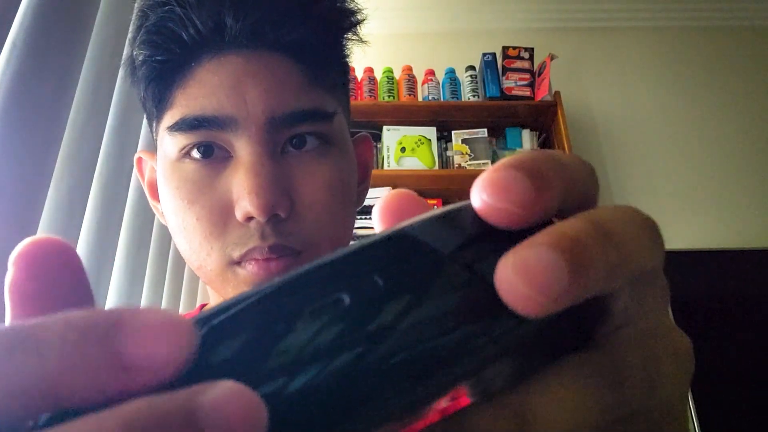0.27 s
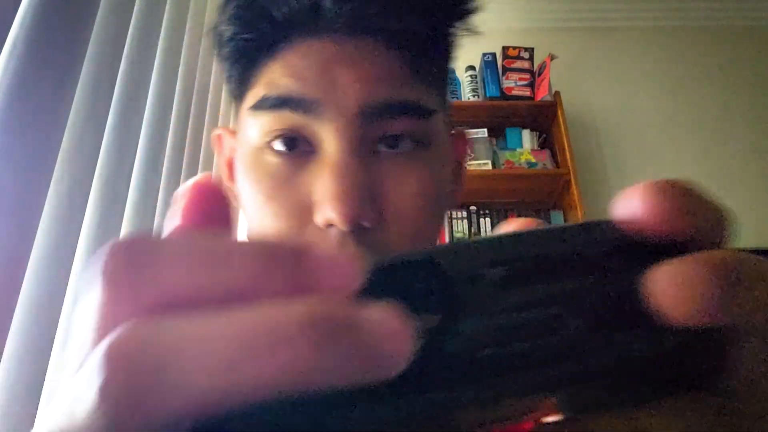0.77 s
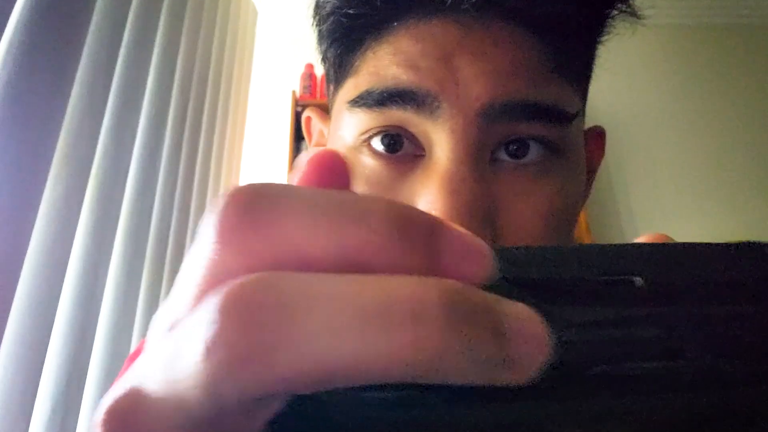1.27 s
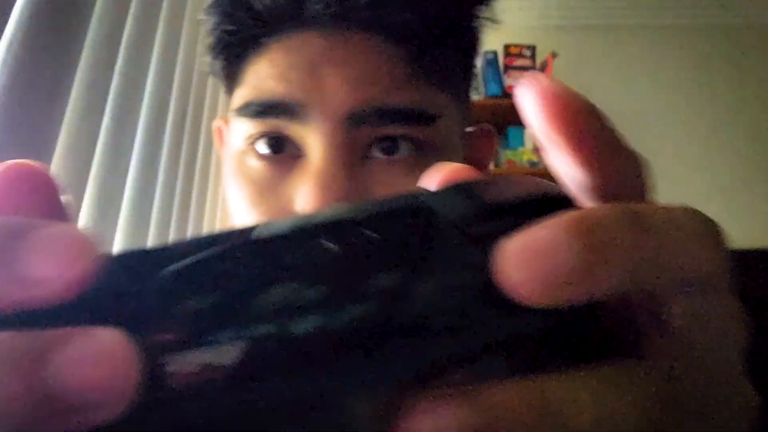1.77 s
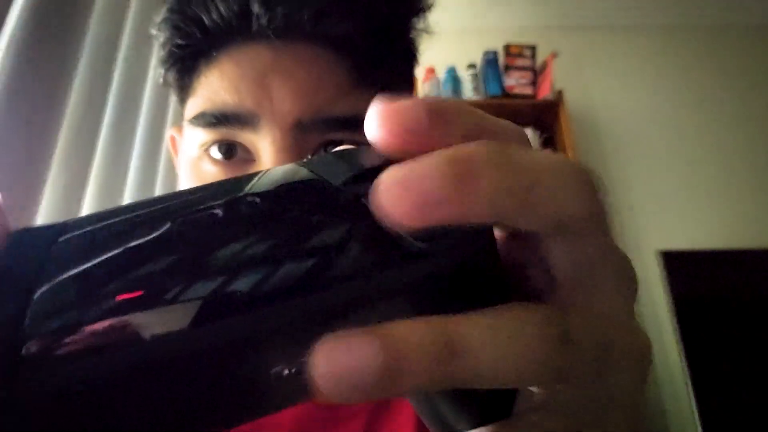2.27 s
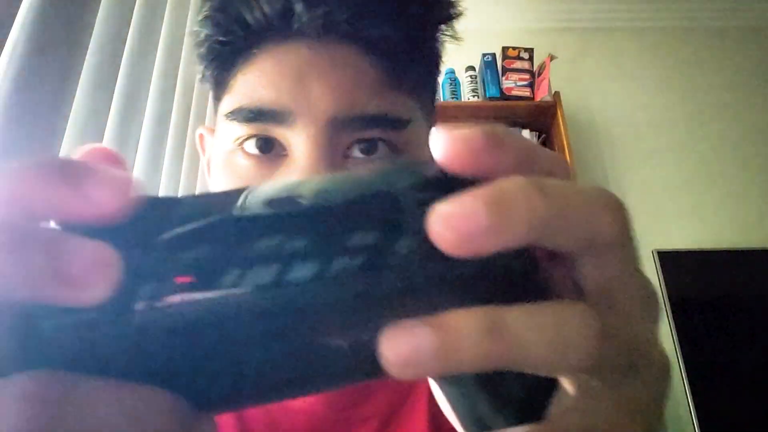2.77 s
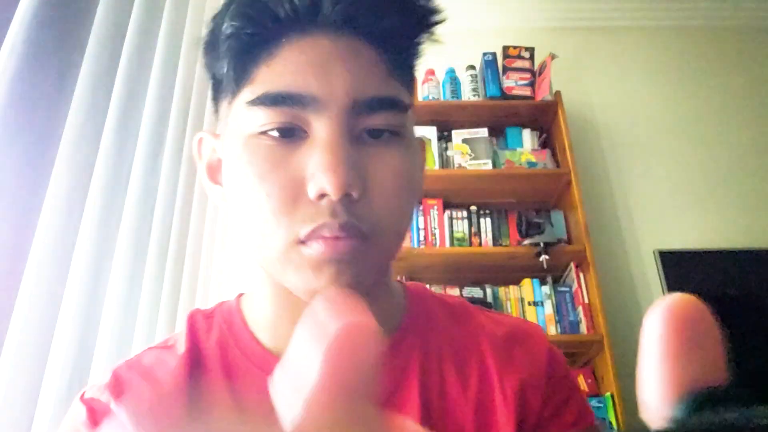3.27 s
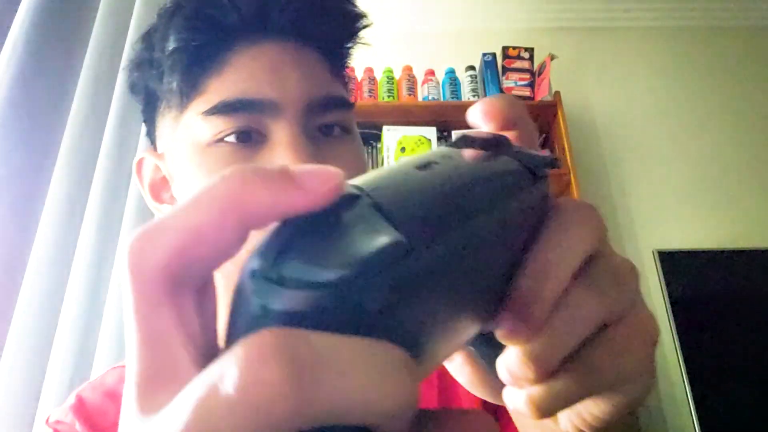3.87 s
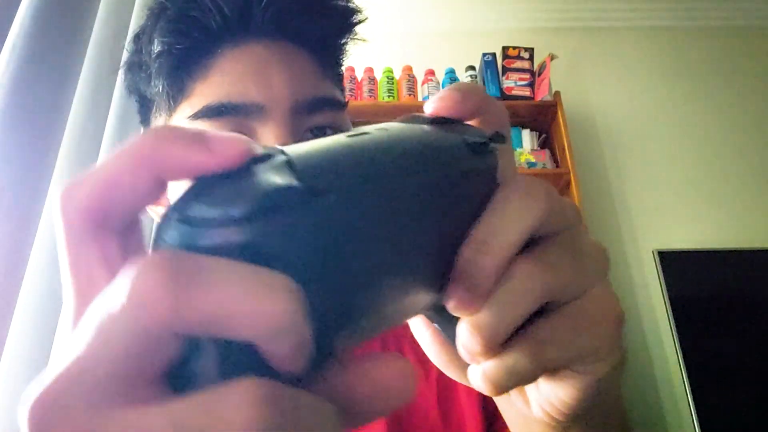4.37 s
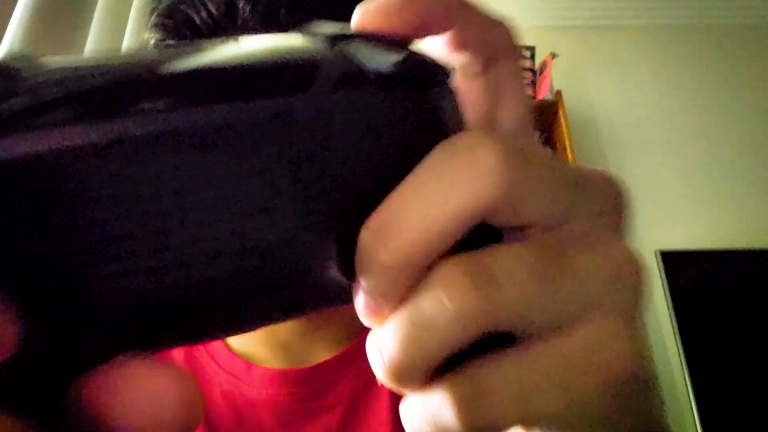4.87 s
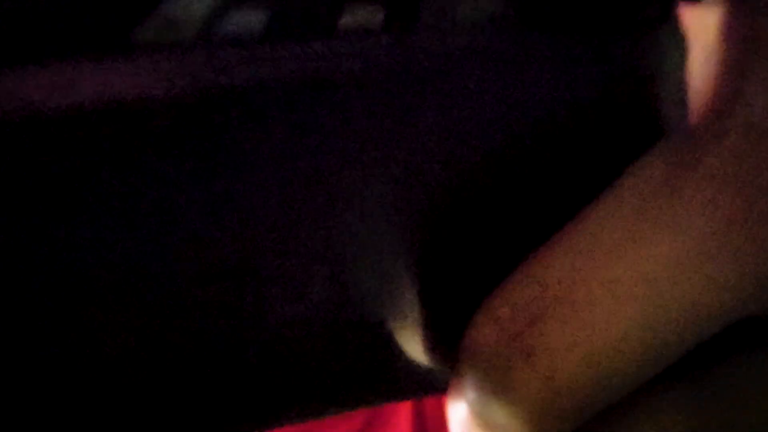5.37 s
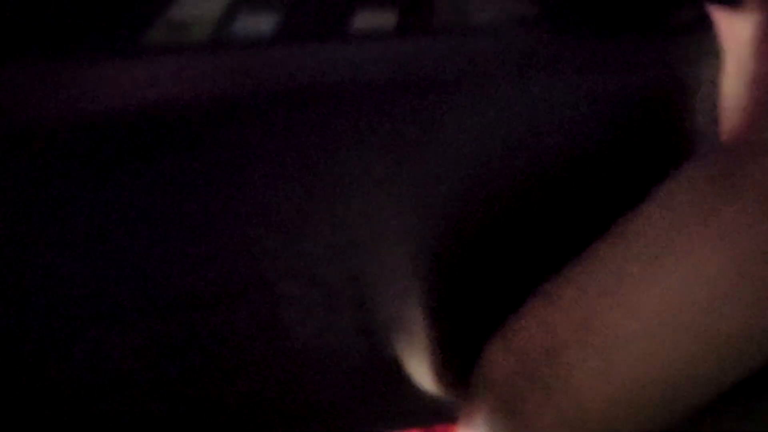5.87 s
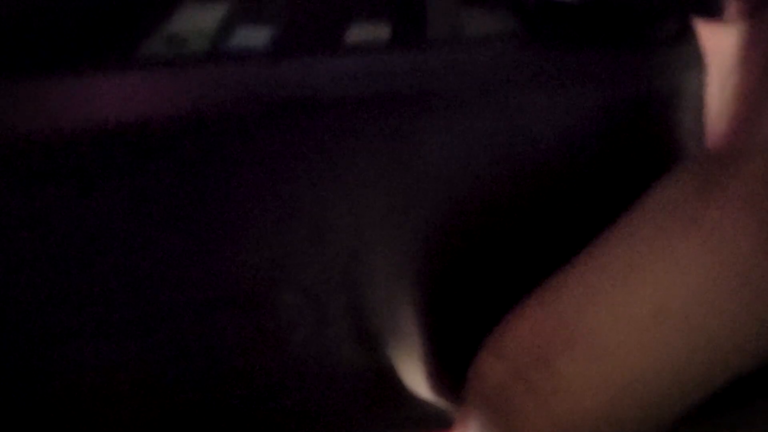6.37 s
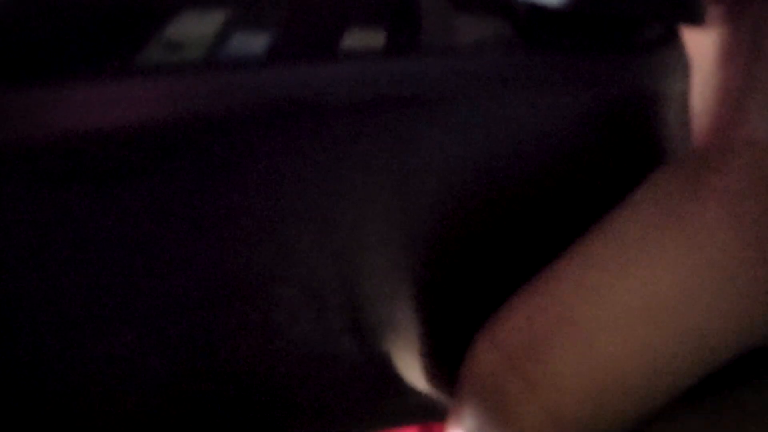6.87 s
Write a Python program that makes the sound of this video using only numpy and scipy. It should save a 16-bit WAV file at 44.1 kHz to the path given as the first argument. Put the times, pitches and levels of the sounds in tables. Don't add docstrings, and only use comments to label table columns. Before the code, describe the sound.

A hollow plastic game controller is handled very close to the microphone in a small room with a faint low hum. From 0 to 0.95 seconds, scattered firm button clicks mix with light pats and soft knocks. From 1.0 to 1.6, clicking gets denser, with hard nail snaps at 1.0 and 1.35, a slap at 1.4 and a loud knuckle rap at 1.55. Light ticks lead to another heavy rap at 2.06, a clattering double press at 2.3 and raps at 2.7 and 2.96. It is sparser around 3.0-3.5, with skin hiss, then a hard snap at 3.67. Bright slaps and small rattles continue to 4.8, with a tiny stuttering hinge creak near 4.57 and a sliding hiss near 4.9. From 5.03 to 7.1, a trigger clacks roughly every 0.2 seconds, quieter and drier, with tiny return clicks between and soft low thumps.

```python
import sys
import numpy as np
from scipy import signal
from scipy.fft import rfft, irfft, next_fast_len
from scipy.io import wavfile
from scipy.ndimage import uniform_filter1d, map_coordinates

SR = 44100
rng = np.random.default_rng(int(sys.argv[2]) if len(sys.argv) > 2 else 0)


def digitize_waveform(pressure):
    field = np.atleast_2d(pressure).T
    bounded = np.clip(field, -1, 1)
    quanta = np.round(bounded * 32767).astype(np.int16)
    wavfile.write(sys.argv[1], SR, quanta)


def gain_from_decibels(decibels):
    exponent = np.asarray(decibels, float) / 20
    return 10 ** exponent


N = 314433

# start in seconds, peak in dB, struck piece in Hz, chatter time in ms.
PRESSES = [(0.058, -5.5, 3880, 1.16), (0.5186, -8, 3900, 1.38), (0.7398, -8.5, 3860, 1.05),
           (0.9121, -8.5, 3900, 0.56), (1.242, -6, 1900, 1.6), (2.0648, -9.5, 1700, 1.5),
           (2.3081, -7, 1200, 1.6), (2.3168, -8.5, 2070, 1.27), (2.5938, -7.5, 1010, 1.2),
           (3.2254, -12.5, 1090, 0.85), (3.951, -9, 4140, 0.62)]
SLAPS = [
    (1.1034, -9, 1270, 1.36),
    (1.4174, -5, 3940, 1.4),
    (3.5501, -7, 4170, 0.68),
    (3.744, -8, 4430, 2.06),
    (4.3415, -13, 4120, 0.92),
    (4.6088, -9, 3800, 1),
    (4.8054, -7, 4040, 1.87),
]
SNAPS = [
    (0.9967, -8.5, 3730, 1.45),
    (1.347, 0.5, 3700, 0.97),
    (3.672, 0, 2820, 1.04),
]
RAPS = [
    (1.5549, 0.5, 3420, 1.06),
    (2.06, -0.5, 1600, 1.37),
    (2.7144, -6, 3130, 1.1),
    (2.961, -3, 3760, 1.23),
]
STOPS = [(5.032, -7.5, 5450, 1.54), (5.2381, -8, 3840, 0.87), (5.4147, -11, 4200, 1.47),
         (5.6557, -11, 4970, 1.07), (5.8466, -10, 2780, 1.19), (6.049, -10.5, 3800, 1.1),
         (6.275, -11.5, 3930, 1.87), (6.4859, -9.5, 4060, 1.66), (6.6824, -13, 3830, 1.06),
         (6.8976, -11.5, 4000, 1.74), (7.095, -12, 3940, 1.23)]
RETURNS = [
    (5.1416, -19, 3020, 2.7),
    (5.5633, -25.5, 3320, 1.9),
    (5.7897, -26, 3700, 1.63),
    (5.99, -26.5, 1050, 3.56),
    (6.207, -28, 3240, 3.04),
    (6.4117, -26.5, 1100, 1.5),
    (6.6109, -25.5, 2850, 1.3),
    (6.8177, -25.5, 2920, 1.2),
]
KNOCKS = [(0.2762, -24, 1270, 0.61), (0.573, -28, 1200, 0.35), (0.7315, -26.5, 1690, 1.47),
          (1.0805, -21, 6000, 1), (1.2638, -22, 1540, 0.94), (1.7993, -20.5, 4130, 0.55),
          (1.8965, -18.5, 1100, 0.81), (1.9734, -42, 1740, 3.7), (2.114, -22, 3660, 0.5),
          (2.1838, -15, 1100, 0.7), (2.6052, -19.5, 3600, 0.86), (2.7761, -24, 4860, 0.57),
          (2.8168, -20.5, 1260, 0.42), (3.5338, -18, 1620, 0.85), (3.772, -16, 1690, 0.52),
          (3.98, -20, 1710, 0.94), (4.1581, -11.5, 4300, 0.45), (4.5134, -27.5, 1140, 2.15),
          (6.9095, -21.5, 2360, 1.4)]
NUDGES = [(0.08, -34.5, 3990, 6.6), (0.447, -26, 1430, 1.2), (1.0246, -19.5, 1200, 1.96),
          (1.37, -32, 2750, 1.7), (1.4265, -14, 6100, 1.32), (1.5805, -24, 2460, 3.7),
          (1.7932, -21, 2740, 1.53), (1.9108, -16.5, 2730, 1.29), (2.1057, -24, 5960, 0.4),
          (2.348, -17.5, 3800, 0.42), (2.474, -32, 2180, 1.55), (3.132, -24, 3360, 0.79),
          (3.171, -16.5, 2950, 2.6), (3.516, -35.5, 1230, 5.7), (3.9166, -25.5, 2490, 2.3),
          (4.0963, -28, 3130, 1.28), (4.1635, -17.5, 1650, 1.05), (4.3018, -18, 2580, 1.41),
          (4.3635, -16.5, 1610, 0.77), (4.6269, -18, 1630, 1.25), (4.7325, -24, 1100, 2.56),
          (5.2273, -12, 4030, 1.53), (6.7108, -19, 2320, 1.25)]
TICKS = [(1.5693, -20, 1800, 4.2), (1.6507, -31, 2500, 0.73), (1.67, -20.5, 3120, 0.77),
         (1.7462, -26, 3900, 0.87), (1.8201, -19.5, 3920, 0.56), (1.9638, -31, 3770, 1.4),
         (1.9917, -34, 2250, 1.4), (2.22, -31.5, 4230, 0.96), (2.2563, -29.5, 3940, 0.72),
         (2.4674, -29.5, 3700, 0.93), (2.5527, -33, 4110, 0.86), (2.681, -27, 3850, 1.04),
         (3.0517, -18, 3280, 2.2), (4.2654, -37, 1640, 2.5)]
PATS = [(0.03, -26, 1360, 0.58), (0.044, -18.5, 1590, 2.6), (0.3362, -32, 1320, 0.62),
        (0.8506, -14.5, 1390, 1.43), (1.165, -21.5, 6200, 1.4), (1.3866, -26, 2190, 2.8),
        (1.3936, -28.5, 1350, 1.6), (1.5236, -28, 5000, 0.5), (2.0314, -24, 2130, 1.2),
        (2.0477, -19, 2200, 1.03), (2.3432, -17, 5020, 0.4), (2.8687, -25.5, 1150, 1.5),
        (2.912, -25.5, 1320, 1.28), (3.3086, -17, 2270, 2.2), (3.5097, -38, 1740, 2.6),
        (3.558, -30, 4350, 4.3), (3.6987, -21, 3000, 4.5), (4.744, -15, 1380, 2.24),
        (7.0237, -21.5, 2640, 1.4)]
THUDS = [(0.6279, -27, 2550, 3.3), (0.7514, -46, 1350, 0.73), (1.1967, -22.5, 1530, 2.05),
         (1.334, -31.5, 1380, 1.1), (2.451, -39, 2130, 0.65), (2.5307, -32, 1220, 2.3),
         (2.5695, -25.5, 3950, 0.47), (2.736, -15.5, 2480, 1.1), (2.7641, -21.5, 5000, 0.35),
         (2.899, -33, 1570, 2.5), (3.301, -23.5, 2340, 2.4), (4.1055, -30, 2900, 2.3),
         (4.6345, -35, 4000, 1.7), (4.8257, -15.5, 1500, 1.69), (4.8476, -33, 1450, 2.2),
         (6.0296, -33, 1500, 0.72), (6.6195, -36.5, 3700, 3.3), (7.0989, -19.5, 2340, 1.5)]
BUMPS = [(1.474, -31.5, 1750, 1.5), (2.1655, -29, 2970, 1), (2.282, -50, 1600, 1.4),
         (2.2972, -29, 1410, 1.6), (2.7947, -44, 2390, 2.8), (3.8697, -33, 1410, 3.2),
         (3.8752, -32.5, 1460, 7.9), (4.0738, -34.5, 3000, 1.03), (4.3335, -33, 1350, 2),
         (5.1513, -25, 1220, 2.02), (5.8312, -34.5, 1550, 1.1), (6.2507, -40, 1470, 1.5),
         (6.402, -35, 1370, 4.2), (6.4517, -39.5, 1310, 1.2)]
BRUSHES = [
    (0.201, -42, 1250, 1.2),
    (0.421, -60, 1380, 1.35),
    (0.823, -33.5, 1370, 1.7),
    (3.264, -36.5, 1290, 2),
    (4.947, -33, 3830, 2.8),
    (5.343, -35.5, 4020, 2.8),
]
REBOUNDS = [(0.037, -36, 1500, 0.82), (0.8355, -42, 1500, 1), (0.8735, -38, 1300, 1.2),
            (1.3995, -42, 1300, 0.83), (1.452, -35, 1300, 1), (1.4598, -35, 1700, 1),
            (1.625, -33.5, 1500, 1.1), (1.98, -42, 1300, 0.88), (2.1878, -22.5, 1100, 0.71),
            (2.79, -40, 1300, 1), (3.7285, -28, 1500, 1.1), (3.9375, -36, 1300, 1), (7.034, -39, 1300, 1)]
CLATTERS = [(2.0568, -16, 2200, 0.89), (2.0722, -28, 2110, 1.34), (2.3128, -8.5, 1200, 1.6),
            (2.3205, -21, 1900, 1.86), (2.7115, -31, 1300, 1.1), (2.7195, -16, 2500, 0.65),
            (2.7245, -26, 3800, 0.89), (3.6775, -13.5, 2600, 1.03), (3.6838, -29, 4500, 1.4),
            (3.695, -24, 2700, 2), (6.6795, -30, 4000, 0.68), (0.9945, -28, 3000, 1.1),
            (2.5915, -33, 1700, 1.7), (5.412, -21, 4000, 0.99), (7.0925, -28, 4000, 1)]
PRICKS = [(1.384, -31, 4000, 0.4), (1.4745, -31, 5000, 0.8), (1.8973, -19, 5140, 0.32),
          (2.1882, -17, 6000, 0.39), (2.3385, -36, 4000, 0.5), (2.4768, -36, 5000, 0.25),
          (3.1337, -26, 7500, 0.37), (3.7047, -22, 5300, 0.55), (3.8776, -37, 7500, 0.5),
          (3.981, -20, 5000, 0.39), (4.1646, -12.5, 4940, 0.4), (4.1704, -31, 4000, 0.4),
          (4.1842, -35, 4000, 0.5), (4.1983, -37, 4000, 0.65), (4.735, -25, 7500, 0.57),
          (4.8274, -19, 5300, 0.39), (5.4286, -43, 4000, 0.46), (5.9912, -25, 7500, 0.33),
          (5.9955, -30, 5300, 0.4), (6.211, -34, 7500, 0.49), (6.612, -39, 2920, 0.87),
          (6.6243, -39, 5200, 0.6), (7.102, -29, 7020, 0.45)]
# contact table, hollow level in dB, edge level in dB.
DRIVES = [(PRESSES, -11, -7), (SLAPS, -9.5, -1.5), (SNAPS, -24, 0), (RAPS, -15, -3), (STOPS, -3.5, -1.7),
          (RETURNS, -7, -8.5), (KNOCKS, -4, 3.1), (NUDGES, -7, -2.6), (TICKS, -23, -2.1),
          (PATS, -18.5, -14), (THUDS, -6, -10), (BUMPS, -1.2, -30)]
# contact table, hollow level in dB, edge level in dB.
LESSER_DRIVES = [(REBOUNDS, -1.7, -9), (CLATTERS, -13, -10), (PRICKS, -34, 0)]

# centre in Hz, width in Hz, level in dB.
HOLLOW_MODES = [(376, 400, -17), (683, 122, 3)]
# centre in Hz, width in Hz, level in dB.
FACE_MODES = [(1258, 145, 3.5), (1704, 675, 4), (2460, 236, 5.5), (2720, 406, 1), (3717, 457, 3.5),
              (3985, 464, 3), (5135, 830, 5.5), (5380, 1220, 4), (7330, 640, -4.5)]
# centre in Hz, width in Hz, level in dB.
EDGE_MODES = [(6900, 6500, -2), (9100, 960, 19.5), (11380, 1080, 18), (13300, 6900, 13)]
# centre in Hz, width in Hz, level in dB.
TRIGGER_MODES = [(1100, 68, 0.5), (1360, 310, 0), (2550, 154, -1), (4040, 203, 11), (5490, 820, -1)]
# centre in Hz, width in Hz, level in dB.
HINGE_MODES = [(740, 240, 2), (1600, 260, -1), (3900, 1500, -19)]
# time in seconds, shell note in Hz.
CUPPING = [(0, 740), (1.3, 711), (1.5, 700), (1.95, 700), (2.06, 650), (2.18, 620), (2.31, 700), (2.6, 685),
           (2.72, 690), (2.96, 735), (3.17, 625), (3.5, 696), (3.9, 672), (5.7, 730), (5.85, 593),
           (6.05, 727), (6.27, 700), (6.5, 725)]

# time in seconds, peak in dB, pitch in Hz.
PUSHES = [(5.151, -30, 80), (5.24, -30, 91), (5.35, -25, 72), (5.416, -32, 106), (5.453, -34, 70.6),
          (5.56, -30, 116), (5.657, -32, 141), (5.792, -26.5, 102), (5.845, -28, 152), (6.048, -28, 133),
          (6.132, -33, 64), (6.211, -25.5, 82.5), (6.274, -31, 141), (6.415, -32.5, 112),
          (6.618, -29.5, 124), (6.815, -31, 118), (6.896, -34, 130), (7.044, -28.5, 75.5),
          (7.091, -34, 120)]
# start in seconds, hold in seconds, hiss level in dB.
SLIDES = [
    (0.873, 0.035, -56),
    (1.44, 0.06, -50.5),
    (3.037, 0.027, -57),
    (3.274, 0.14, -53),
    (3.753, 0.031, -57),
    (4.893, 0.1, -51),
    (5.303, 0.082, -52.5),
]
# frequency in Hz, density in dB per Hz.
SKIN_SPECTRUM = [(1500, 0), (2600, 11.5), (6300, 10), (11000, 11), (15800, 8.5)]
# time in seconds, rustle level in dB.
GRIP = [(0, -58.5), (.9, -53.5), (1.2, -58), (1.4, -52), (1.48, -58), (1.6, -47), (1.72, -55.5), (2.2, -51),
        (2.5, -55.5), (3.3, -53), (3.45, -56), (3.75, -53.5), (4.3, -55.5), (4.75, -52), (4.97, -58),
        (5.1, -53.5), (5.45, -58.5), (7.13, -57.5)]

# frequency in Hz, T60 in seconds, level in dB.
ROOM = [(350, 0.07, -10), (815, 0.32, -22.5), (1500, 0.2, -13), (3700, 0.33, -19.5), (6900, 0.55, -19),
        (14000, 0.77, -34)]
# time in seconds, level in dB.
HUM = [(0, -43.5), (2, -42.5), (4.5, -42.5), (5.6, -41), (7.13, -44)]
# frequency in Hz, density in dB per Hz.
RUMBLE_SPECTRUM = [(15, -38), (25, -29), (54, -3), (81, -2.5), (111, -8.5), (237, -24.5), (450, -31),
                   (580, -72), (990, -120)]
# frequency in Hz, gain in dB.
MIC = [(15500, 0.5), (16200, -27), (16900, -22), (17200, -68)]


def unit(x):
    return x / np.sqrt(np.mean(x ** 2) + 1e-20)


def peak_unit(rows):
    return rows / np.abs(rows).max(axis=1, keepdims=True)


def along(points, hz, column=1):
    cols = np.transpose(points)
    return np.interp(np.log(hz + 1), np.log(cols[0] + 1), cols[column])


def curve(points):
    return np.interp(np.arange(N) / SR, *np.transpose(points))


def wobble(rate_hz):
    knots = rng.standard_normal(int(N * rate_hz / SR) + 4)
    return map_coordinates(knots, [np.arange(N) * rate_hz / SR])


def filtered(x, response):
    n = x.shape[-1]
    size = next_fast_len(n + 8192)
    return irfft(rfft(x, size) * response(np.fft.rfftfreq(size, 1 / SR)), size)[..., :n]


def modes(table, shift=1, strike=lambda hz: 1, widen=1):
    def response(hz):
        total = 0
        for k, (centre_hz, width_hz, db) in enumerate(table):
            damping = 1j * hz * width_hz * widen
            gain = (-1) ** k * gain_from_decibels(db) * strike(centre_hz)
            total = total + gain * damping / ((centre_hz * shift) ** 2 - hz * hz + damping)
        return total
    return response


def placed(times_s, rows):
    at = np.round(np.asarray(times_s) * SR).astype(int)[:, None] + np.arange(rows.shape[1])
    return np.bincount(at.ravel(), rows.ravel(), N + SR)[:N]


def contacts(drives):
    return sorted((*row, hollow_db, edge_db) for table, hollow_db, edge_db in drives for row in table)


def clicks(events):
    s, db, struck_hz, chatter_ms, hollow_db, edge_db = np.transpose(events)[:, :, None]
    start_s = s[:, 0]
    t = np.arange(1024) / SR
    spikes = gain_from_decibels(4.74 * rng.standard_normal((len(s), len(t))))
    grit = rng.standard_normal((len(s), len(t))) * spikes
    grip = 1 + 0.02 * rng.standard_normal((len(s), 3))
    on_stop = np.isin(s, np.transpose(STOPS)[0])
    hardness = np.clip((db + 35) / 25, 0, 1)

    rest_hz = 735
    cupping = np.clip(1.44 * hardness, 0, 1) ** 2
    shell_hz = rest_hz + cupping * (np.interp(s, *np.transpose(CUPPING)) - rest_hz)
    shell_shift = shell_hz / HOLLOW_MODES[1][0] * np.sqrt(grip[:, :1])
    shell_widen = 1.31 ** on_stop * 0.79 ** (1 - hardness)
    hollow = modes(HOLLOW_MODES, shell_shift, widen=shell_widen)

    def spot(hz):
        return gain_from_decibels(-8) + gain_from_decibels(-60 * np.log2(hz / struck_hz) ** 2)

    def faces(hz):
        return modes(FACE_MODES, grip[:, 1:2], spot)(hz) * (1j * hz / (450 + 1j * hz)) ** 2

    # response, level dB, chatter stretch, stop share, sign; the blunt stop drives mostly the shell
    parts = [(hollow, hollow_db + 3, 1.1, 3, -1),
             (faces, -3.5, 0.95, 1.2, -1),
             (modes(EDGE_MODES, grip[:, 2:]), edge_db - 4.5, 0.8, 0.7, 1)]
    rows = 0
    for response, part_db, stretch, stop_share, sign in parts:
        u = t / (np.clip(chatter_ms, 0.2, 5) * stretch / 1000)
        loose = 0.62 * np.clip(chatter_ms, 0, 1) * np.tanh(u) * np.exp(-t / 0.003)
        chatter = grit * (u * np.exp(-u) + loose)
        stop = np.sinc((u - 1) / u[:, 1:2]) * np.linalg.norm(chatter, axis=1, keepdims=True)
        ring = filtered(chatter + stop_share * hardness * stop, response)
        rows = rows + sign * gain_from_decibels(db + part_db) * peak_unit(ring)

    blow = np.sinc(t * SR - 1.1 * chatter_ms / 1000 * SR)
    piece = filtered(blow, modes([(struck_hz, struck_hz / 6.6, 0)]))
    rows = rows - gain_from_decibels(db - 9) * peak_unit(piece)
    lever = filtered(blow, modes(TRIGGER_MODES, grip[:, :1]))
    direct = rows + on_stop * gain_from_decibels(db + 2.5) * peak_unit(lever)
    wall = gain_from_decibels(-23) * filtered(direct, lambda hz: 1 / (1 + 1j * hz / 1200) ** 2)
    return placed(start_s, direct) + placed(start_s + 0.0257, wall) + room(start_s, rows)


def room(times_s, rows):
    hz, t, z = signal.stft(rng.standard_normal((len(rows), SR // 6)), SR, nperseg=256)
    power = uniform_filter1d(np.abs(rfft(rows)) ** 2, size=29, axis=1)
    heard = np.sqrt(np.abs(power))[:, ::4, None]
    z = z * gain_from_decibels(3 * rng.standard_normal((len(rows), 1, len(t))))
    decay = gain_from_decibels(-60 * t / along(ROOM, hz)[:, None])
    decay = decay / np.sqrt(np.sum(decay ** 2, axis=1, keepdims=True))
    decay = decay * gain_from_decibels(along(ROOM, hz, column=2))[:, None]
    tails = signal.istft(z * heard * decay, SR, nperseg=256)[1] / np.sqrt(128)
    rise = 1 - np.exp(-np.arange(tails.shape[1]) / SR / 0.00017)
    near_db = np.interp(times_s, [4.8, 5.4], [0, -3.5])[:, None]
    return placed(times_s + 0.0026, gain_from_decibels(near_db) * tails * rise)


def rattle():
    s, db = np.transpose(SNAPS + RAPS + SLAPS + STOPS)[:2]
    t = np.arange(SR // 8) / SR
    t60_s = 0.2
    fade = placed(s + 0.0024, gain_from_decibels(db[:, None] - 32.5 - 60 * t / t60_s))
    grains = rng.standard_normal(N) * gain_from_decibels(7.5 * wobble(250))

    def caps_and_shell(hz):
        caps = 1j * hz / (700 + 1j * hz) / (1 + 1j * hz / 5460) ** 2
        return caps + 3.2 * modes(HOLLOW_MODES[1:])(hz)

    return fade * unit(filtered(grains, caps_and_shell))


def creak():
    slip = np.arange(5)
    t = np.arange(400) / SR
    envelope = gain_from_decibels(0.6 * slip[:, None] - 60 * t / 0.0025)
    bursts = envelope * rng.standard_normal((len(slip), len(t)))
    slips = filtered(placed(4.563 + 0.0088 * slip, bursts), modes(HINGE_MODES))
    return gain_from_decibels(-33) * slips / np.abs(slips).max()


def pushes():
    s, db, hz = np.transpose(PUSHES)[:, :, None]
    cycles = np.arange(2048) / SR * hz
    shove = -np.sin(2 * np.pi * cycles) * 4 * cycles * np.exp(-cycles / 0.6)
    return placed(s[:, 0] - 0.35 / hz[:, 0], gain_from_decibels(db) * shove)


def sliding():
    t = np.arange(N) / SR
    rise_s, fall_s, rest_db = 0.12, 0.11, -62
    power = gain_from_decibels(rest_db) ** 2
    for s, hold_s, db in SLIDES:
        corners_s = [s - rise_s, s, s + hold_s, s + hold_s + fall_s]
        power = power + (gain_from_decibels(db) * np.interp(t, corners_s, [0, 1, 1, 0])) ** 2
    return np.sqrt(power)


def handling():
    hiss = filtered(rng.standard_normal(N), lambda hz: gain_from_decibels(along(SKIN_SPECTRUM, hz)) * (hz < 15900))
    drag = gain_from_decibels(2 * wobble(30))
    grain = gain_from_decibels(2.5 * wobble(80))

    def shell(hz):
        return modes(HOLLOW_MODES[1:])(hz) + gain_from_decibels(-10) / (1 + 1j * hz / 2500)

    rustle = filtered(rng.standard_normal(N) * grain, shell)
    return sliding() * unit(hiss * drag) + gain_from_decibels(curve(GRIP)) * unit(rustle)


def hum():
    rumble = filtered(rng.standard_normal(N), lambda hz: gain_from_decibels(along(RUMBLE_SPECTRUM, hz)))
    lumps = gain_from_decibels(2 * wobble(9))
    return gain_from_decibels(curve(HUM)) * unit(rumble * lumps)


def scene():
    brushes = contacts([(BRUSHES, -2.5, -9)])
    pad = clicks(contacts(DRIVES) + brushes) + clicks(contacts(LESSER_DRIVES))
    mix = pad + rattle() + creak() + pushes() + handling() + hum()
    return mix[None]


def low_pass(x):
    return signal.sosfilt(signal.butter(12, 17140, fs=SR, output="sos"), x)


def record(dry):
    squashed = dry / (1 + np.abs(dry / 0.97) ** 6) ** (1 / 6)
    mix = filtered(squashed, lambda hz: gain_from_decibels(along(MIC, hz)))
    return low_pass(mix)


dry = scene()
out = record(dry)
digitize_waveform(out)
```